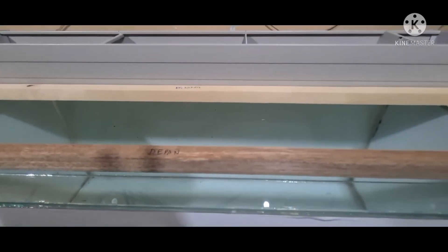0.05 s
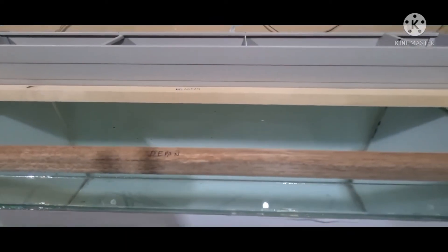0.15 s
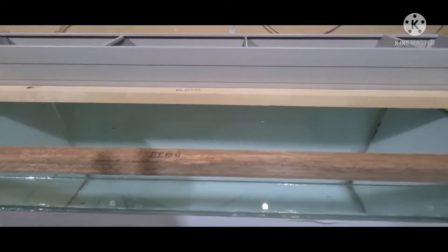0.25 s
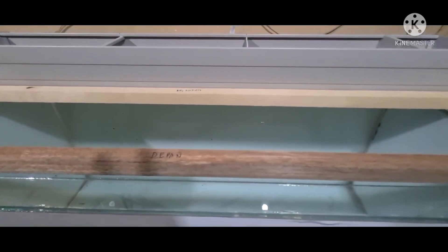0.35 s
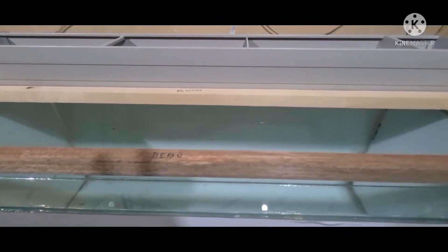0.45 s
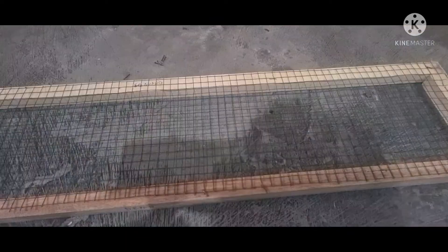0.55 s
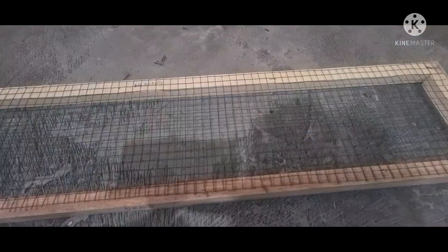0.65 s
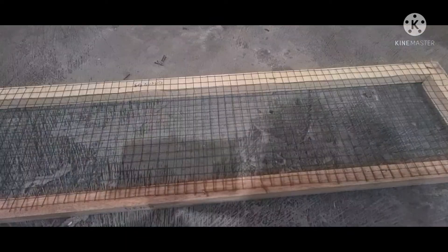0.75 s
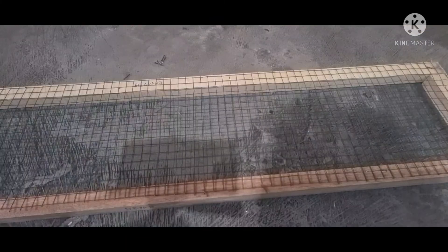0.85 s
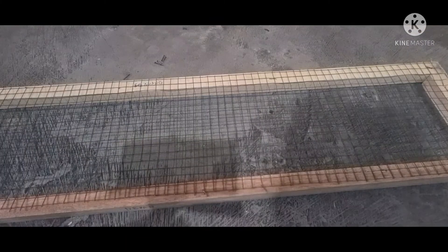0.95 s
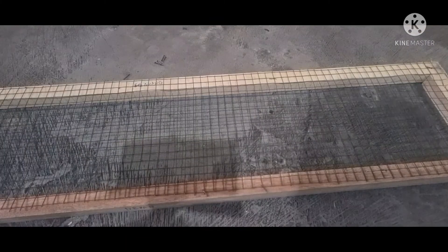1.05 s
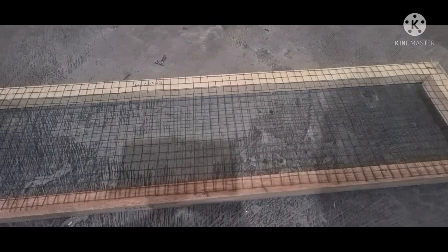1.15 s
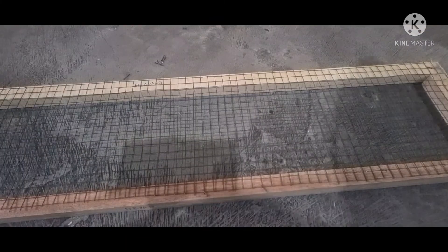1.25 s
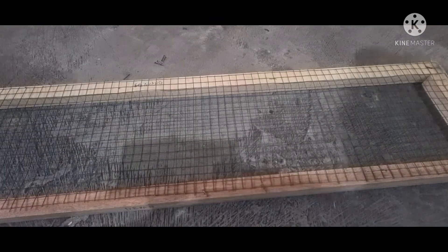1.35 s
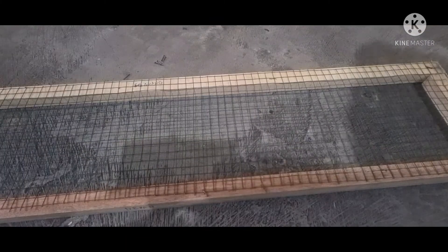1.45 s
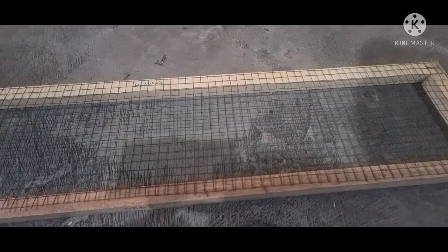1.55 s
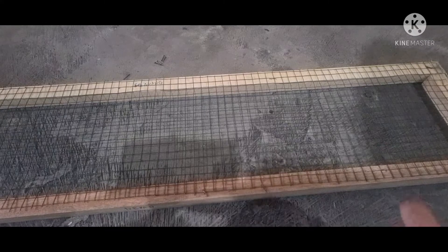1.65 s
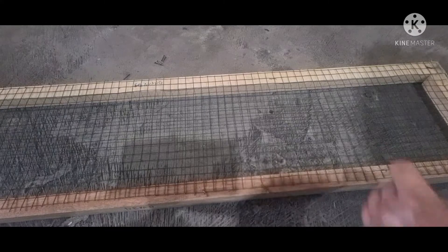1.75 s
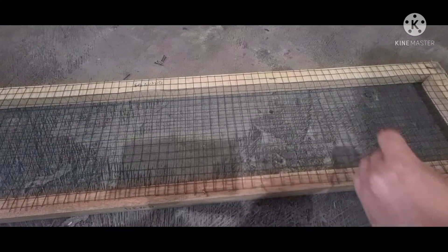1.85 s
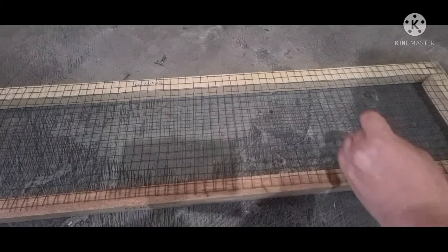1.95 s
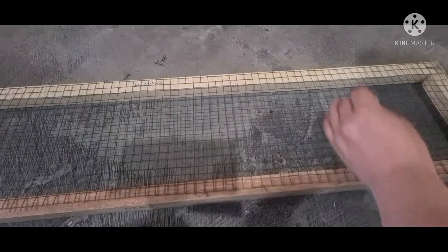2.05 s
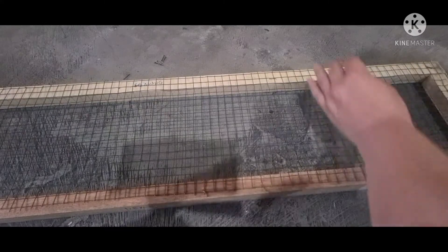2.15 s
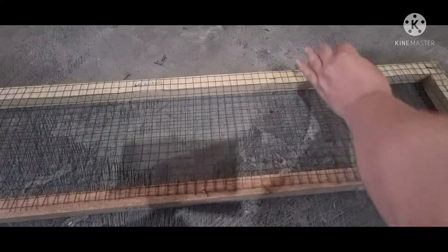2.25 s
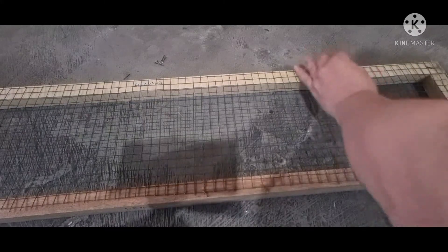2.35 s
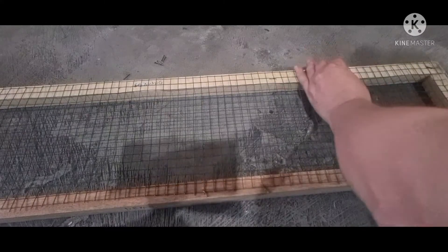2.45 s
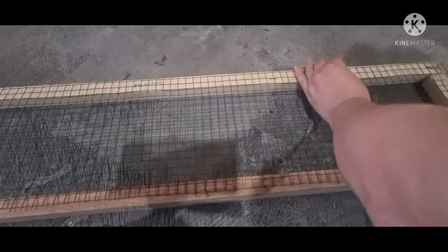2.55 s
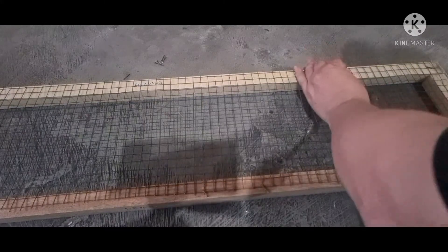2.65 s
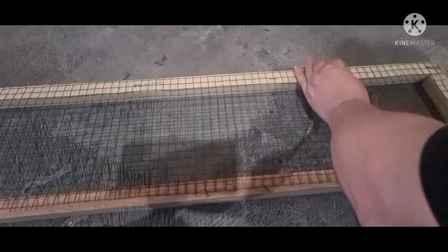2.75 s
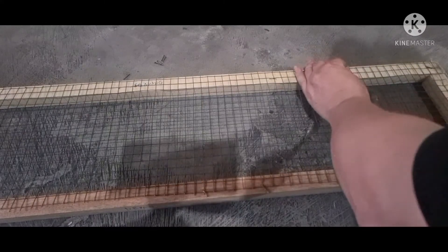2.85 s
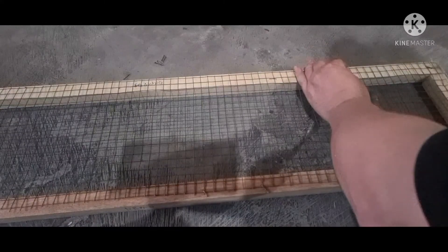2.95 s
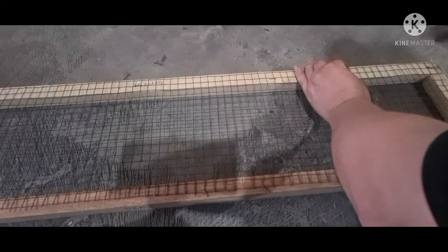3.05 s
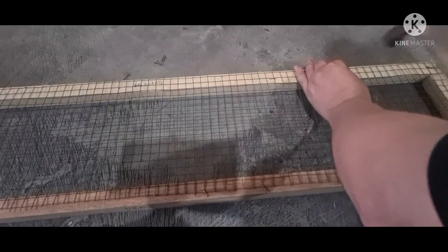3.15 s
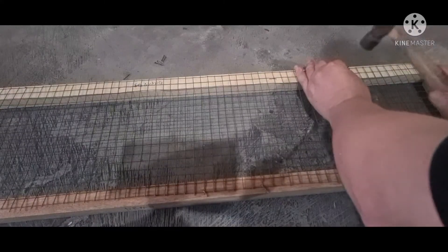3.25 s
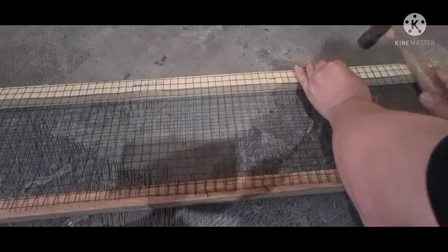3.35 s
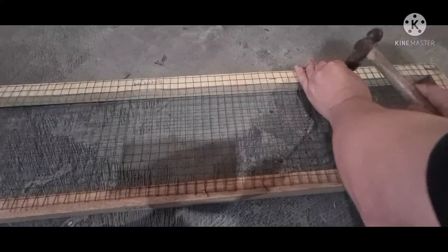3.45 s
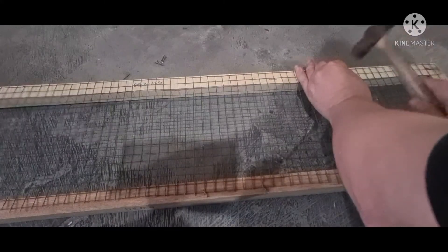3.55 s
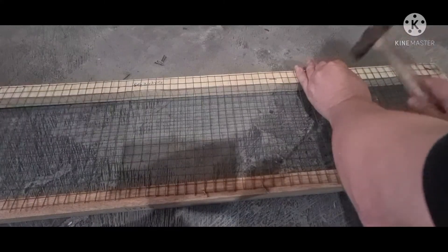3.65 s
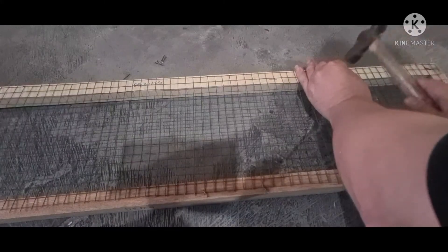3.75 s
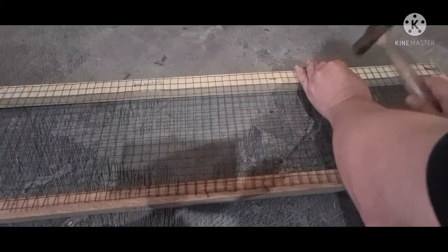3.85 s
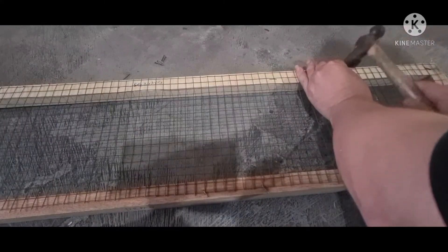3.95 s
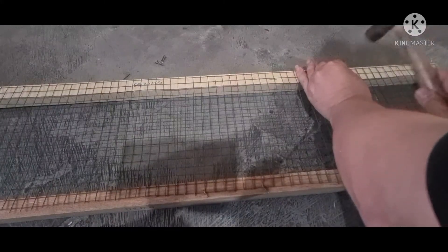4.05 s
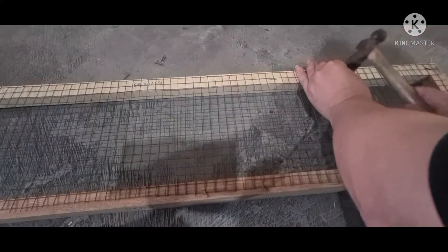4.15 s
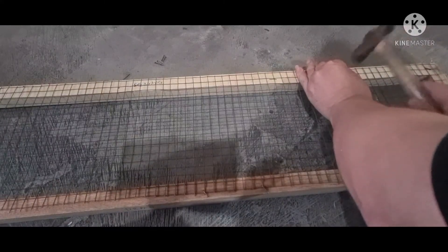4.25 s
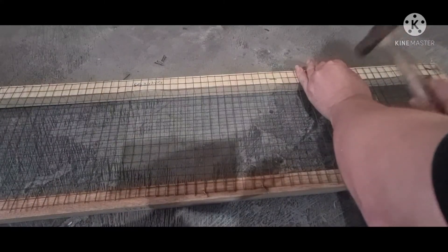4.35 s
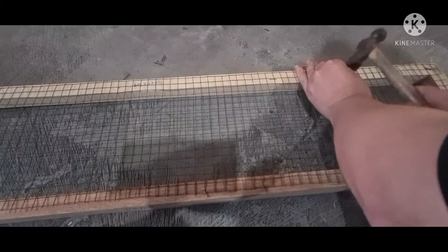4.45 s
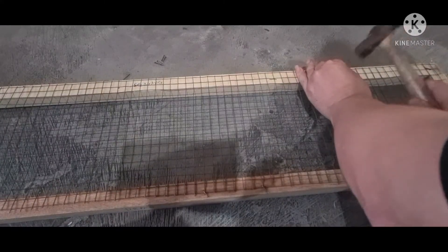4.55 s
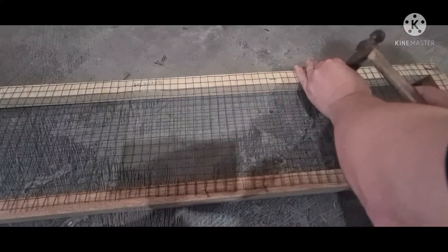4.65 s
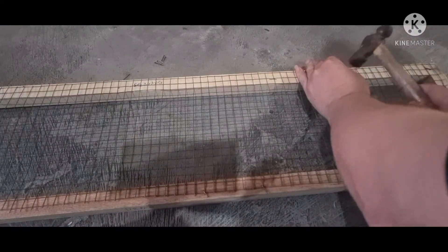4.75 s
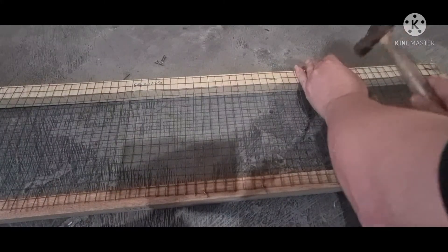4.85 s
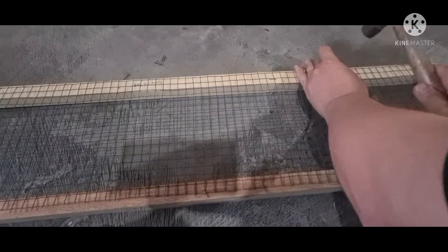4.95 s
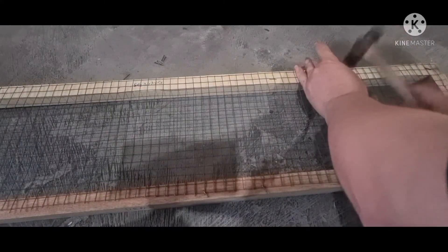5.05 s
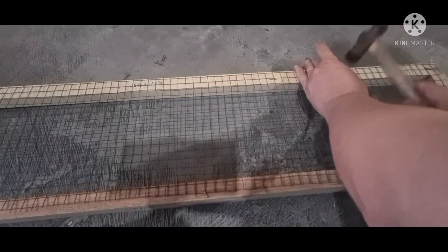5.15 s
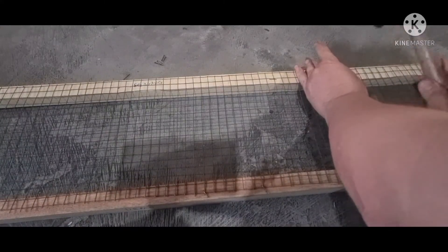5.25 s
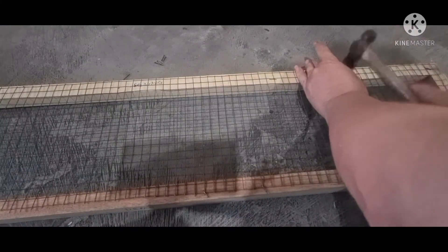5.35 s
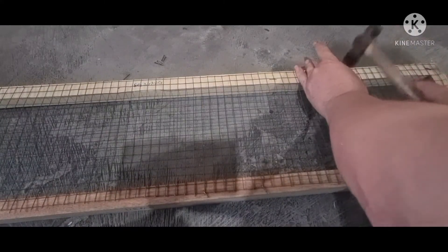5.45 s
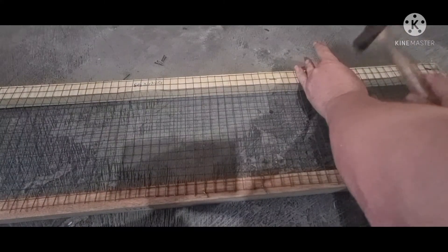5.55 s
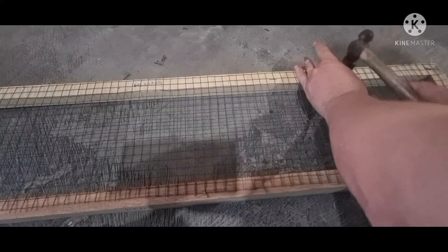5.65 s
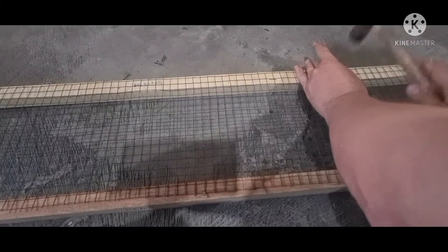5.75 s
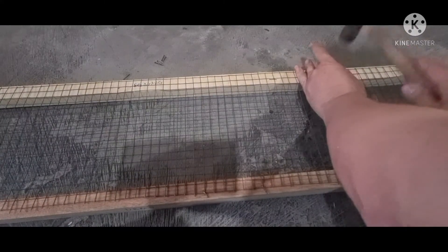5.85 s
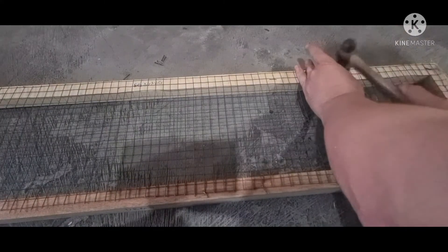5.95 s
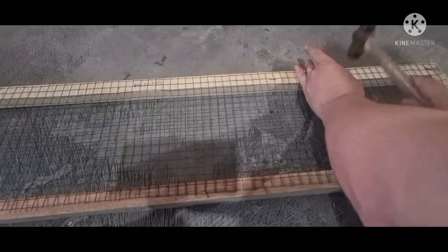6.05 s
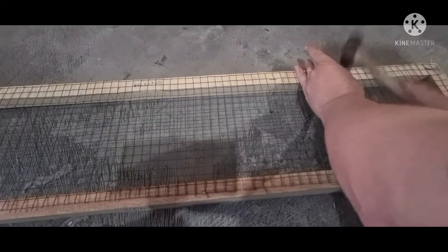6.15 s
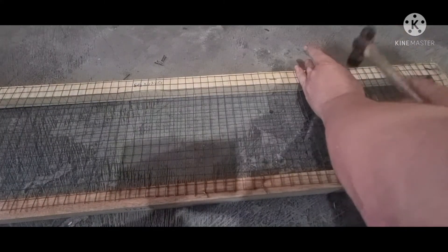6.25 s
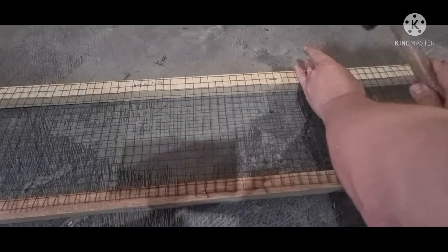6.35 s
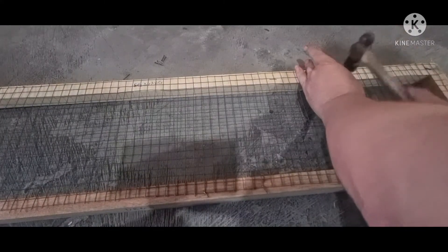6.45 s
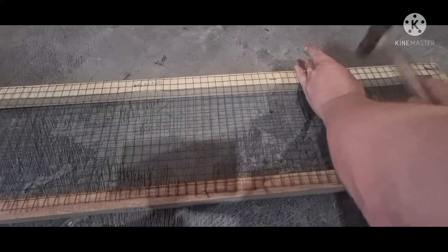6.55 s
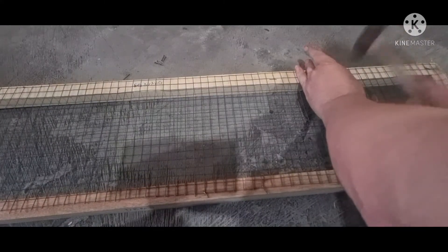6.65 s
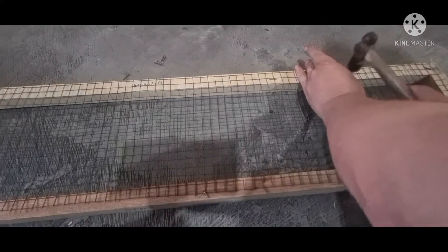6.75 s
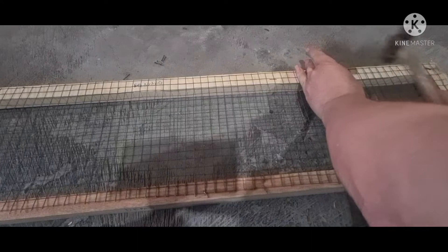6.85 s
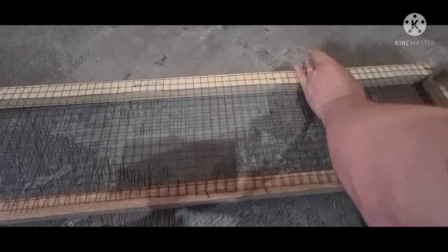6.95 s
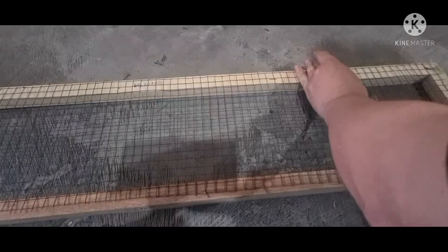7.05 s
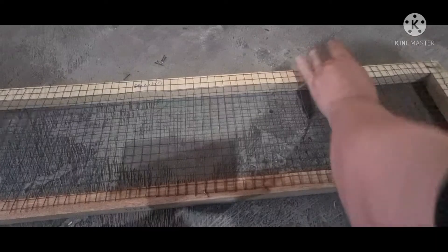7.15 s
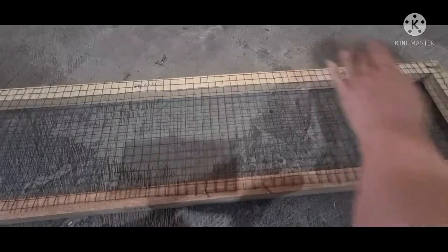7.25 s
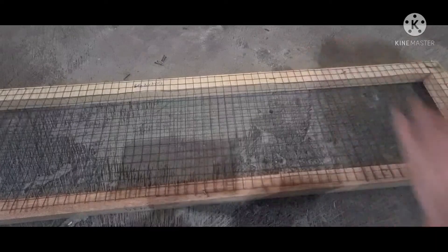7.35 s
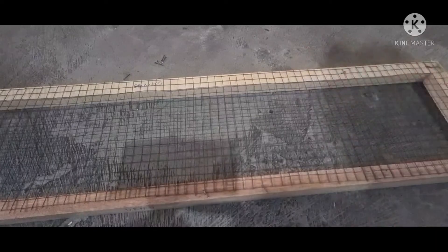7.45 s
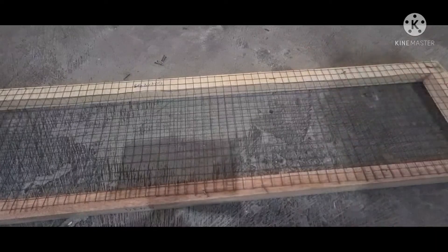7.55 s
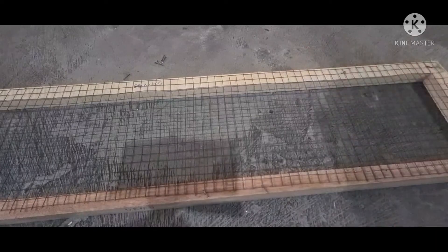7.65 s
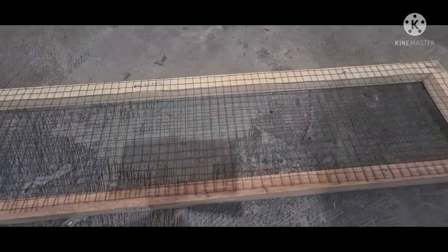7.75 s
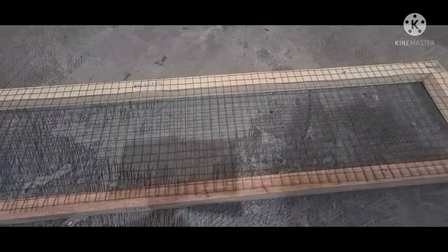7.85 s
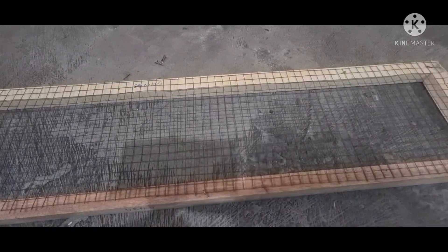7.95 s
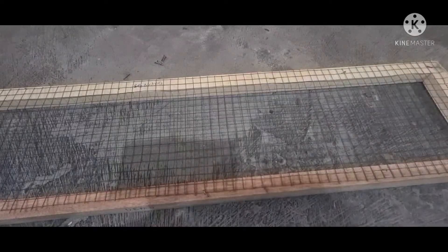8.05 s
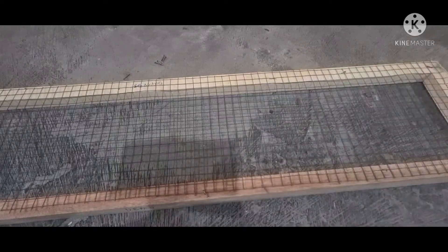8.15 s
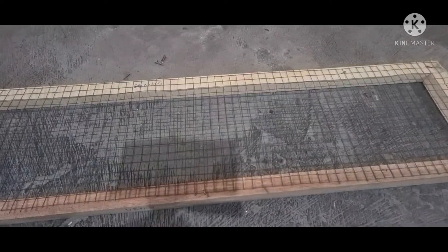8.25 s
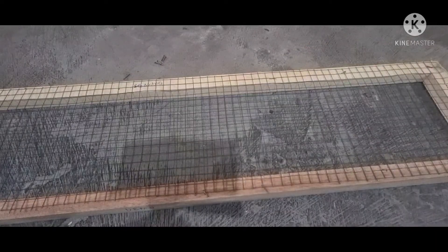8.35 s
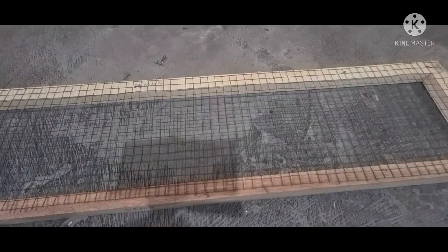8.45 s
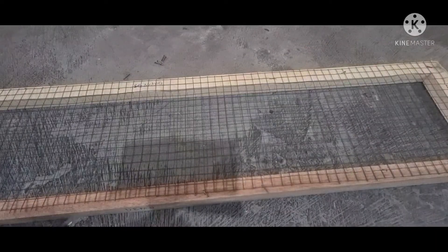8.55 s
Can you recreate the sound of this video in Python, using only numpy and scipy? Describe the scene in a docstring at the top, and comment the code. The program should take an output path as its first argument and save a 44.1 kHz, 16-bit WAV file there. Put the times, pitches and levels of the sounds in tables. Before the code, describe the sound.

Dull room tone cuts to a tiny silence, then a low motor hum fades in. A wooden frame drags and bumps over concrete with a thin wire squeal; shoes scuff and a hand rustles the mesh. Thirteen bright hammer blows follow, about four a second, with wood thud, steel ring and mesh rattle. The hammer is laid down with dead knocks, and a sole swishes past. Close stereo pickup in a live, bare workshop.

```python
"""A bare workshop with a concrete floor, heard by two microphones 0.17 m apart: room tone, then brief silence.
A motor's hum and rumble (sines, coloured noise) fade in; a mesh-covered wooden frame is dragged up, bumping
and squealing (shaped grains, pulses). Shoes scuff and pivot, a hand presses the mesh, wire rubs on a nail.
A hammer taps the nail in: wood and steel ring as decaying modes, mesh rattles, the frame hops, the room echoes.
Laid down, it knocks dead; a sole scuffs and swishes past, a heel lands, and shoes scuff faintly again."""
import sys
import numpy as np
from scipy import signal
from scipy.fft import rfft, irfft, next_fast_len
from scipy.io import wavfile

SR = 44100
rng = np.random.default_rng(int(sys.argv[2]) if len(sys.argv) > 2 else 0)


def inscribe(sig):
    """Save sig as 16-bit PCM at rate SR to the path in sys.argv[1].

    A 1-D sig is mono; a 2-D sig holds one channel per row.
    Samples are clipped to [-1, 1] before scaling.
    """
    pcm = np.round(np.clip(np.atleast_2d(sig).T, -1, 1) * 32767)
    wavfile.write(sys.argv[1], SR, pcm.astype(np.int16))


N = 379260
TIME = np.arange(N) / SR

# Levels in the tables are relative within each source; the mix and the room set the balance.
# room tone before the silence: [f/Hz, level/dB]
OPENING_COLOUR = [(15, -56), (25, -32), (43, -4), (106, -2), (134, -11), (243, -8), (463, -22),
                  (500, -22.5), (979, -30), (1060, -19), (1140, -38), (1270, -27), (12000, -65),
                  (15600, -106), (22000, -120)]
OPENING_DB = -43.5
# all sound drops out briefly: [from t/s, to t/s]
SILENCE_SPAN = (0.448, 0.57)

# low rumble and faint air noise around the microphones: [f/Hz, level/dB]
RUMBLE_COLOUR = [(15, -48.5), (25, -10), (59, 0.5), (78, 0), (108, -9), (128, -6.5), (157, -8), (189, 3),
                 (210, -7), (301, -18), (372, -14.5), (408, -32), (600, -35), (780, -29), (1320, -120)]
AIR_COLOUR = [(240, -23), (400, 1), (687, -2.5), (1630, -5.5), (1760, -7), (4440, -21.5), (4800, -22.5),
              (5350, -24), (14600, -38.5), (16000, -43)]
# the motor's hum tones: [f/Hz, level/dB]
HUM_TONES = [(47.5, -49.5), (140.5, -49), (188, -49.5), (378, -59.5)]
# the motor's faint whine: [f/Hz, width/Hz, level/dB]
WHINE_BAND = [(1734, 22, 0)]
RUMBLE_DB, AIR_DB, WHINE_DB = -39, -49.5, -63.5
# rumble, air and whine hold steady, then sink slowly; the whine sinks with the air
SINKS_FROM_S, RUMBLE_SINK_DB_PER_S, AIR_SINK_DB_PER_S = 3.5, 0.6, 1

# paths to each microphone, direct and off the floor: [delay/ms, level/dB]
LEFT_MIC_PATHS = [(0.078, -5), (0.978, -48)]
RIGHT_MIC_PATHS = [(0, 14.67), (1.506, 2.6)]
# echo strength of the workshop: [f/Hz, level/dB]
ROOM_ECHO_COLOUR = [(80, 8), (200, 0), (370, 6), (560, 4.5), (800, 2.5), (1300, 7), (2200, 1), (3300, 0),
                    (7000, 2), (15000, 6)]
# first echoes from nearby walls: [left delay/ms, right delay/ms, level/dB]
NEAR_WALL_ECHOES = [(9.56, 10.4, -10), (12.93, 12.1, -10.5), (20.26, 21.2, -11)]
# standing waves of the room: [mean f/Hz, mean level/dB, t60/s]
ROOM_MODES = [(179, 1.5, 0.15), (212.4, -6, .3), (366, 0.5, 0.3), (425.5, 1, 0.54), (475, 0, 0.44),
              (676, -3, 0.28), (796, -7, .3)]
BOOM_DB, MIC_SPACING_M = -21, 0.17
# base t60, shortened above the wall cut and in the bass
ROOM_T60_S, WALL_CUT_HZ, BASS_LOSS_HZ = 0.48, 14300, 36.3

# wood dragged over the rough floor: [f/Hz, level/dB]
DRAG_SPECTRUM = [(120, -20), (200, -2), (560, -0.5), (775, -4.5), (980, 2), (3060, -20), (3730, -19),
                 (4390, -26), (5760, -25), (6650, -21), (15000, -54)]
# resonances of the squealing wire end: [f/Hz, width/Hz, level/dB]
SQUEAL_BANDS = [(2490, 73, 7), (2653, 82, 7), (3050, 59, 12), (4410, 70, 11), (6600, 61, 6.5),
                (9000, 110, -3.5), (11400, 400, -11)]
# the wire end catches twice on the way: [t/s, hold/s, level/dB]
WIRE_CATCHES = [(0.663, 0.056, -54), (0.89, 0.11, -59.5)]
CATCH_ATTACK_S, CATCH_RELEASE_S = 0.13, 0.095
# the frame is dragged in one pull
PULL_AT_S, PULL_ATTACK_S, PULL_HOLD_S, PULL_RELEASE_S, PULL_DB = 0.76, 0.28, 0.24, 0.056, -31.5
# rms swings of pitch (share) and level, each with the upper limit of its pace
SQUEAL_WANDER, WANDER_HZ = 0.006, 60
STICK_DB, STICK_HZ = 5, 45
JUDDER_DB, JUDDER_HZ = 2.2, 40

# the frame is bumped: [t/s, level/dB, brightness f/Hz]
FRAME_BUMPS = [(.623, -8.5, 3300), (0.821, -11.5, 2020), (0.8974, -10.5, 2240), (1.003, -19, 2200),
               (1.212, -9, 1820), (1.982, -11, 1830), (2.026, -15.5, 490), (2.598, -23, 2000),
               (3.397, -20, 1100), (3.586, -4, 1680)]
# clicks of wire and grit: [t/s, level/dB, pitch f/Hz]
WIRE_TICKS = [(1.175, -44, 6100), (1.699, -14.5, 3070), (2.488, -31, 4250), (2.51, -46, 4830),
              (2.873, -35, 4050), (3.297, -49, 9000), (3.33, -53, 8900), (7.29, -30.5, 2630),
              (8.499, -33.5, 4760), (8.561, -28, 3500)]

# shoes sliding on concrete: [full speed at t/s, attack/s, hold/s, level/dB, weight on the sole/dB]
SHOE_SCUFFS = [(1.513, .1, 0.027, -39.5, -6), (1.591, 0.034, 0.088, -30.5, -3),
               (2.112, 0.14, 0.16, -55.5, -16), (2.292, 0.052, 0.017, -41, -8),
               (7.628, 0.064, 0.14, -42, -0.5), (8.128, 0.48, 0.028, -65, -24),
               (8.317, 0.071, 0.027, -65.5, 5), (8.54, 0.14, .07, -51.5, 1.5)]
# spectra of dull sole, rasping concrete face and rolling grit: [f/Hz, level/dB per Hz]
SOLE_COLOUR = [(400, -14), (900, -8), (1350, -5), (1750, -3), (2200, -9), (3000, -20)]
RASP_COLOUR = [(1700, -30), (2400, -2.5), (3000, 6), (4200, 0), (6000, -28)]
GRIT_COLOUR = [(3000, -6), (4700, 1), (7000, -1), (11000, -7), (15500, -9.5)]
SCUFF_RELEASE_S, SOLE_RELEASE_S = 0.0079, 0.0093
RASP_DB, RASP_FOLLOWS_WEIGHT = 0.1, 0.22  # dB, and dB per dB of weight

# a shoe pivots with a short rub close by: [f/Hz, level/dB per Hz]
PIVOT_COLOUR = [(500, -20), (1100, -14.5), (1450, -7.5), (1720, 1), (2050, -8), (2500, -11.5), (3500, -16),
                (6000, -29)]
PIVOT_AT_S, PIVOT_ATTACK_S, PIVOT_HOLD_S, PIVOT_RELEASE_S, PIVOT_DB = 2.272, 0.05, 0.06, 0.03, -39.5
# a hand presses the mesh onto the frame: [f/Hz, level/dB per Hz]
PALM_COLOUR = [(150, 0), (400, 6), (1200, 5.5), (2000, -8), (5000, -41), (12000, -40)]
PRESS_AT_S, PRESS_ATTACK_S, PRESS_HOLD_S, PRESS_RELEASE_S, PRESS_DB = 2.5, 0.03, 0.014, 0.062, -41.5
# mesh rubs on the nail: [f/Hz, width/Hz, level/dB]
SQUEAK_BANDS = [(2790, 89, 22), (3170, 98, 11), (4530, 160, -2)]
RUB_AT_S, RUB_ATTACK_S, RUB_HOLD_S, RUB_RELEASE_S, RUB_DB = 3.398, 0.008, 0.026, 0.018, -54.5

# hammer blows: [t/s, frame thud level/dB, batten level/dB, nail ring level/dB, lower ring level/dB,
#                steel tick level/dB, tick pitch f/Hz, top click level/dB, mesh shake level/dB]
HAMMER_BLOWS = [(3.5621, -5.5, -3.5, -12.5, -20, -7.5, 8350, -19, -13),
                (3.8125, 3.5, 2, -8.5, -6, -7.5, 8000, -18, -34),
                (4.02, 3.5, 3.5, -1.5, 3.5, -14, 8800, -11.5, -17),
                (4.279, 2.5, 1.5, -2, 1.5, 0, 7700, -10.5, -12),
                (4.5179, 2.5, 3, -0.5, 4.5, -15, 9000, -10.5, -12),
                (4.727, 4, 1, -1, -1, -23, 8100, -13, -10), (5.1927, 2, 1, -0.5, 6, -28, 7150, -25, -8.5),
                (5.485, 1, 0.5, 0, -1, 7.5, 7700, -25, -8), (5.729, 0.5, -1, 0, 2, 4.5, 7100, -19, -7),
                (6.052, -3, -0.5, -12.5, -5.5, -27, 9500, -14.5, -19),
                (6.293, -5, -2, -14.5, -12, -34, 9000, -14, -28), (6.57, 6, 4, -4.5, -9, -6, 8500, -14, -2),
                (6.808, 6, 6, -5.5, -12, -18, 9000, -18, -1)]
# modes of frame on floor, batten, nail and the lower, longer ring: [mean f/Hz, mean level/dB, t60/s]
THUD_MODES = [(73.4, -9.5, 0.038), (143, -13, 0.29), (187.8, 0.5, 0.11), (206, 12, 0.046)]
WOOD_MODES = [(388, -8, 0.026), (443, -6.5, 0.02), (672, 2, 0.019), (882, -5.5, 0.013), (1006, -2, 0.018),
              (1310, -1.5, 0.013), (1660, -3, 0.017), (1824, -3.5, 0.014), (2614, -0.5, 0.018),
              (2854, -8.5, 0.014)]
NAIL_MODES = [(3070, -6.5, 0.0081), (3400, 1.5, 0.015), (3620, -4, 0.0076), (3954, -6, 0.0094),
              (4730, -14, 0.012), (5480, -14, 0.013), (6710, -19.5, 0.0083)]
SING_MODES = [(2870, -7, 0.059), (2960, -2, 0.026)]
THUD_DB = 0.5
NAIL_SLIP_S = 0.0006  # the nail gives way and rings just after the contact
MESH_T60_S, MESH_TAPS_PER_S = 0.05, 1800  # mesh against wood
RATTLE_DB, RATTLE_T60_S, RATTLE_PER_S = -12.5, 0.12, 2100  # wires tap on each other
# the frame hops after a blow and lands again: [t/s, level/dB]
FRAME_HOPS = [(3.5743, 2), (3.613, -10), (4.0546, 2), (4.3095, 1.5), (4.563, -3.5), (4.766, -2),
              (5.7577, 2.5), (6.857, 5.5)]
# the mesh springs back against the wood after the first blow: [t/s, level/dB]
MESH_SPRINGS = [(3.602, -16), (3.64, -15.5), (3.672, -24)]
# modes of the loose wire: [mean f/Hz, mean level/dB, t60/s]
WIRE_MODES = [(4160, 10, 0.029), (4570, -5, 0.025), (5600, -9, 0.019)]

# hammer head and handle land and rebound: [t/s, level/dB, brightness f/Hz]
HAMMER_LANDINGS = [(7.3503, -1, 2030), (7.3551, -6, 1600), (7.3705, -1, 3000), (7.3765, -6.5, 1900),
                   (7.44, -14, 1510), (7.477, -21, 2020)]
# a sole sweeps past with a falling swish: [t/s, hold/s, level/dB, pitch f/Hz at that time]
SOLE_SWISHES = [(7.617, 0.023, -47.5, 1570), (7.736, 0.053, -49.5, 1390)]
SWISH_FALL_PER_S, SWISH_WIDTH_HZ = 2.2, 180  # share of the pitch lost in a second, down to half
HEEL_AT_S, HEEL_DB = 7.765, -7  # then the heel comes down

CUTOFF_HZ = 16500  # the top is 60 dB down from here


def from_db(db):
    """Decibels to amplitude ratio."""
    return 10 ** (np.asarray(db) / 20)


def rms_one(x):
    """Scale to rms 1."""
    return x / np.sqrt(np.mean(x ** 2) + 1e-20)


def energy_one(x):
    """Scale to a summed square of 1."""
    return rms_one(x) / np.sqrt(x.shape[-1])


def at_hz(points, hz):
    """Read a spectrum on a log-frequency axis."""
    known, values = np.transpose(points)
    return np.interp(np.log(np.maximum(hz, 1)), np.log(known), values)


def low_pass(x, hz, order=2):
    """Take off the treble above a frequency."""
    return signal.sosfilt(signal.butter(order, min(hz, .45 * SR), fs=SR, output="sos"), x)


def band_pass(x, low_hz, high_hz):
    """Keep one band of a sound."""
    return signal.sosfilt(signal.butter(2, [low_hz, high_hz], "band", fs=SR, output="sos"), x)


def coloured(x, spectrum):
    """Give a sound a spectrum; rms 1."""
    size = next_fast_len(x.shape[-1])
    gain = from_db(at_hz(spectrum, np.fft.rfftfreq(size, 1 / SR)))
    shaped = irfft(rfft(x, size) * gain, size)
    return rms_one(shaped[..., :x.shape[-1]])


def diffuse(size):
    """Noise from all sides: two spaced microphones agree only in the bass."""
    padded = next_fast_len(size)
    mid, side = rfft(rng.standard_normal((2, padded)))
    alike = np.sinc(2 * np.fft.rfftfreq(padded, 1 / SR) * MIC_SPACING_M / 343)  # speed of sound 343 m/s
    pair = np.sqrt(1 + alike) * mid + np.sqrt(1 - alike) * side * [[1], [-1]]
    return rms_one(irfft(pair, padded)[:, :size])


def drift(hz):
    """Slow chance, low-passed noise; rms 1."""
    return rms_one(low_pass(rng.standard_normal(N), hz))


def grains(per_s, spread_db):
    """Random tiny contacts of uneven size; rms 1."""
    sizes = from_db(spread_db * np.minimum(rng.exponential(1, N), 4))
    return rms_one((rng.random(N) < per_s / SR) * sizes * rng.choice([-1, 1], N))


def resonate(x, resonances):
    """Drive parallel resonances; rms 1."""
    total = 0
    for hz, width_hz, db in resonances:
        peak = signal.lfilter(*signal.iirpeak(hz, hz / width_hz, fs=SR), x)
        total = total + from_db(db) * rms_one(peak)
    return rms_one(total)


def stroke(s, attack_s, hold_s, release_s, db):
    """Gain of a sliding move: it swells up to its time, holds and dies; attack and release each span 20 dB."""
    away = np.maximum((s - TIME) / attack_s, (TIME - s - hold_s) / release_s)
    return from_db(db - 20 * np.clip(away, 0, 10))


def snap(low_hz, high_hz):
    """A single contact pulse; energy 1."""
    pulse = signal.unit_impulse(SR // 4) + 1e-18
    return energy_one(band_pass(pulse, low_hz, min(high_hz, .45 * SR)))


def burst(low_hz, high_hz, t60):
    """Many close, quickly damped modes blur into a crack; energy 1."""
    t = TIME[:SR // 4]
    dying = rng.standard_normal(len(t)) * from_db(-60 * t / t60) + 1e-18
    return energy_one(band_pass(dying, low_hz, min(high_hz, .45 * SR)))


def struck(modes, vary_db, detune):
    """One blow on a set of modes, each with a strength and pitch of its own; energy 1."""
    hz, db, t60 = np.transpose(modes)[:, :, None]
    t = TIME[:SR // 4]
    pitch_chance, level_chance = rng.standard_normal((2, len(modes), 1))
    signs = (-1) ** np.arange(len(modes))[:, None]
    waves = signs * np.sin(2 * np.pi * hz * (1 + detune * pitch_chance) * t)
    return energy_one(np.sum(from_db(db + vary_db * level_chance - 60 * t / t60) * waves, axis=0))


def rattle(low_hz, high_hz, per_s, t60):
    """A dying shower of wire taps; energy 1."""
    t = TIME[:SR // 4]
    taps = (rng.random(len(t)) < per_s / SR) * rng.standard_normal(len(t)) * from_db(-60 * t / t60)
    return energy_one(signal.fftconvolve(taps, snap(low_hz, high_hz))[:len(t)])


def add(track, s, sound):
    """Mix a sound in at a time."""
    start = round(s * SR)
    track[..., start:start + sound.shape[-1]] += sound[..., :N - start]


def opening_tone():
    """Diffuse room tone that breaks off at the silence."""
    gate = np.clip((SILENCE_SPAN[0] - TIME) / 0.0016, 0, 1)
    return from_db(OPENING_DB) * coloured(diffuse(N), OPENING_COLOUR) * gate


def background():
    """A motor's wavering hum and whine over low rumble and faint air noise."""
    sinking_s = np.maximum(TIME - SINKS_FROM_S, 0)
    rumble = from_db(RUMBLE_DB - RUMBLE_SINK_DB_PER_S * sinking_s) * coloured(diffuse(N), RUMBLE_COLOUR)
    air = from_db(AIR_DB - AIR_SINK_DB_PER_S * sinking_s) * coloured(diffuse(N), AIR_COLOUR)
    hum = 0
    for hz, db in HUM_TONES:
        phase = 2 * np.pi * hz * TIME + 1.02 * drift(2.27)
        hum = hum + from_db(db) * np.sqrt(2) * np.sin(phase)
    whine = resonate(rng.standard_normal(N), WHINE_BAND)
    whine = from_db(WHINE_DB - AIR_SINK_DB_PER_S * sinking_s) * whine
    return rumble + air + whine + from_db(-3.5) * hum


def workshop(x, echo_db, build_s, lag_ms, pan_db):
    """Direct sound and floor bounce, then dense wall echoes that build up and die by band."""
    t = TIME[:SR * 3 // 4]
    edges = 45 * 2 ** np.arange(0, 9, .5)  # half-octave bands
    noises, tail = [diffuse(len(t)), diffuse(len(t))], 0
    for k, (low, high) in enumerate(zip(edges, edges[1:])):
        hz = np.sqrt(low * high)
        t60 = ROOM_T60_S / (1 + (hz / WALL_CUT_HZ) ** 2 + BASS_LOSS_HZ / hz)
        band = band_pass(noises[k % 2], low, high)
        band = energy_one(band * from_db(-60 * t / t60) * (1 - np.exp(-t / build_s)))
        tail = tail + band * np.sqrt(2 * (high - low) / SR) * from_db(at_hz(ROOM_ECHO_COLOUR, hz))
    left = sum(from_db(db) * np.interp(TIME - (ms + lag_ms) / 1000, TIME, x) for ms, db in LEFT_MIC_PATHS)
    right = sum(from_db(db) * np.interp(TIME - ms / 1000, TIME, x) for ms, db in RIGHT_MIC_PATHS)
    near = np.array([left, right]) * from_db([[pan_db / 2], [-pan_db / 2]])
    return near + from_db(echo_db) * signal.fftconvolve(x[None], tail, axes=1)[:, :N]


def drag():
    """Wood judders over the rough floor in dense slips; a wire end squeals along, sticking and slipping."""
    pull = stroke(PULL_AT_S, PULL_ATTACK_S, PULL_HOLD_S, PULL_RELEASE_S, PULL_DB)
    slips = grains(per_s=2300, spread_db=7.0)
    wandering = TIME + SQUEAL_WANDER * np.cumsum(drift(WANDER_HZ)) / SR
    wire = np.interp(wandering, TIME, resonate(grains(per_s=3000, spread_db=5.0), SQUEAL_BANDS))
    caught = sum(stroke(s, CATCH_ATTACK_S, hold_s, CATCH_RELEASE_S, db) for s, hold_s, db in WIRE_CATCHES)
    squeal = caught * wire * from_db(STICK_DB * drift(STICK_HZ))
    judder = from_db(JUDDER_DB * drift(JUDDER_HZ))
    wood = judder * pull * coloured(slips, DRAG_SPECTRUM)
    return from_db(-10.0) * wood + from_db(6.5) * squeal


def knocks(rows, low_hz, t60):
    """Short dead knocks: one pulse and a brief blur of many modes; each contact has its own brightness."""
    out = np.zeros(N)
    for s, db, bright_hz in rows:
        contact = snap(low_hz, bright_hz) + .5 * burst(low_hz, bright_hz, t60)
        add(out, s, from_db(db) * energy_one(low_pass(contact, 1.2 * bright_hz, order=4)))
    return out


def ticks():
    """A wire or a grain of grit snaps: a sharp edge and a brief ring."""
    out = np.zeros(N)
    for s, db, hz in WIRE_TICKS:
        ring = burst(hz * .5, hz * 1.09, t60=0.033)
        edge = snap(hz * 0.11, 6400)
        add(out, s, from_db(db) * (2.08 * ring + edge))
    return out


def scuffs():
    """A sole rubs dully on the concrete, rasps on its rough face and rolls fine grit under it."""
    sole = rasp = grit = 0
    for s, attack_s, hold_s, db, weight_db in SHOE_SCUFFS:
        slide = stroke(s, attack_s, hold_s, SCUFF_RELEASE_S, db)
        sole = sole + stroke(s, attack_s, hold_s, SOLE_RELEASE_S, db + weight_db)
        rasp = rasp + slide * from_db(RASP_DB + RASP_FOLLOWS_WEIGHT * weight_db)
        grit = grit + slide
    rub = sole * coloured(grains(per_s=2400, spread_db=4.5), SOLE_COLOUR)
    scrape = rasp * coloured(grains(per_s=5100, spread_db=2.5), RASP_COLOUR)
    hiss = grit * coloured(grains(per_s=14000, spread_db=-2.0), GRIT_COLOUR)
    return from_db(-7.5) * (rub + scrape + hiss)


def pivot():
    """A sole twists on the spot in fine slips."""
    twist = stroke(PIVOT_AT_S, PIVOT_ATTACK_S, PIVOT_HOLD_S, PIVOT_RELEASE_S, PIVOT_DB)
    return twist * coloured(grains(per_s=3000, spread_db=2.5), PIVOT_COLOUR)


def palm():
    """The mesh rustles dully under a hand, in many small wire contacts."""
    press = stroke(PRESS_AT_S, PRESS_ATTACK_S, PRESS_HOLD_S, PRESS_RELEASE_S, PRESS_DB)
    return press * coloured(grains(per_s=1100, spread_db=7.5), PALM_COLOUR)


def squeak():
    """Wire sticks and slips briefly against the nail as it is set."""
    rub = stroke(RUB_AT_S, RUB_ATTACK_S, RUB_HOLD_S, RUB_RELEASE_S, RUB_DB)
    return rub * resonate(grains(per_s=1900, spread_db=6.0), SQUEAK_BANDS)


def frame():
    """Each blow cracks in the batten and thuds the frame on the floor."""
    out = np.zeros(N)
    for s, thud_db, batten_db, *_ in HAMMER_BLOWS:
        thud = struck(THUD_MODES, vary_db=.7, detune=.025)
        batten = struck(WOOD_MODES, vary_db=1.0, detune=.009)
        wood = 0.97 * batten + 0.21 * burst(580, 1750, t60=0.016)
        add(out, s, from_db(THUD_DB + thud_db) * thud + from_db(batten_db) * wood)
    return out


def nail():
    """Steel ticks on the nail head, then the nail gives way with a short, gritty clack."""
    out = np.zeros(N)
    for s, _, _, ring_db, _, tick_db, tick_hz, click_db, _ in HAMMER_BLOWS:
        shank = struck(NAIL_MODES, vary_db=1.0, detune=.007)
        clack = 0.49 * burst(2500, 4200, t60=0.014)
        clack += 0.18 * burst(5600, 6400, t60=0.012) + 0.087 * burst(8900, 9100, t60=0.024)
        tick = 0.17 * snap(tick_hz * 0.36, tick_hz)
        tick += 0.68 * burst(tick_hz * 0.42, tick_hz * 0.73, t60=0.013)
        click = 0.5 * snap(8700, 21000) + 0.85 * burst(7300, 23700, t60=0.013)
        add(out, s, from_db(tick_db) * tick + from_db(click_db) * click)
        add(out, s + NAIL_SLIP_S, from_db(ring_db) * (2.48 * shank + clack))
    return out


def singing():
    """A lower, longer ring follows each blow and carries mostly through the room."""
    out = np.zeros(N)
    for s, _, _, _, sing_db, *_ in HAMMER_BLOWS:
        add(out, s, from_db(sing_db) * 0.33 * struck(SING_MODES, vary_db=4.0, detune=0.0033))
    return out


def mesh():
    """The shaken mesh chatters against the wood and its wires rattle a little longer."""
    out = np.zeros(N)
    for s, *_, shake_db in HAMMER_BLOWS:
        chatter = 0.93 * rattle(920, 2020, MESH_TAPS_PER_S, MESH_T60_S)
        chatter += 1.02 * rattle(2060, 4100, MESH_TAPS_PER_S, MESH_T60_S)
        wires = from_db(RATTLE_DB) * rattle(2700, 11500, RATTLE_PER_S, RATTLE_T60_S)
        add(out, s, from_db(shake_db) * (chatter + wires))
    return out


def boom(x):
    """Heavy knocks set the room's standing waves ringing, differently at each microphone."""
    shared = struck(ROOM_MODES, vary_db=0, detune=0)
    own = [struck(ROOM_MODES[2:], vary_db=2, detune=.005) for _ in range(2)]
    ringing = shared + 0.28 * np.array(own)
    return from_db(BOOM_DB) * signal.fftconvolve(x[None], ringing, axes=1)[:, :N]


def near_walls(x):
    """Nearby walls throw a blow back to each microphone as discrete delayed copies."""
    out = 0
    for left_ms, right_ms, db in NEAR_WALL_ECHOES:
        echoes = [np.interp(TIME - ms / 1000, TIME, x) for ms in (left_ms, right_ms)]
        out = out + from_db(db) * np.array(echoes)
    return out


def hops():
    """The frame falls back on the concrete with a duller clap."""
    out = np.zeros(N)
    for s, db in FRAME_HOPS:
        thud = struck(THUD_MODES, vary_db=1, detune=.03)
        clap = 0.28 * snap(280, 1070) + 0.35 * burst(130, 1340, t60=0.044)
        add(out, s, from_db(db) * (0.5 * thud + clap))
    return out


def springs():
    """Loose wire pings on the batten and buzzes out in a short shower."""
    out = np.zeros(N)
    for s, db in MESH_SPRINGS:
        ping = struck(WIRE_MODES, vary_db=1.5, detune=.012)
        buzz = 0.8 * rattle(3100, 5300, 2500, t60=0.037) + 0.36 * rattle(2000, 8300, 2500, t60=0.02)
        add(out, s, from_db(db) * (.65 * ping + buzz))
    return out


def step_back():
    """A sole sweeps over the floor, its pitch falling as it slows, and the heel lands."""
    out = np.zeros(N)
    for s, hold_s, db, hz in SOLE_SWISHES:
        speed = np.clip(1 - SWISH_FALL_PER_S * (TIME - s), .5, 2)
        rub = resonate(grains(per_s=4000, spread_db=0.5), [(hz, SWISH_WIDTH_HZ, 0)])
        travelled = np.cumsum(speed) / SR % TIME[-1]  # read the rub at the sole's speed
        out += stroke(s, 0.041, hold_s, .05, db) * np.interp(travelled, TIME, rub)
    heel = burst(63, 190, t60=0.11) + 0.34 * snap(200, 1300)
    add(out, HEEL_AT_S, from_db(HEEL_DB) * heel)
    return out


def scene():
    """Room tone and a moment of silence, then the work, each source placed before the microphones."""
    rubbing = ticks() + drag() + palm() + squeak() + scuffs()
    handling = workshop(rubbing, echo_db=4.5, build_s=0.00011, lag_ms=0.334, pan_db=15.5)
    bump = knocks(FRAME_BUMPS, low_hz=200, t60=0.047)
    bumps = workshop(bump, echo_db=1.0, build_s=0.00099, lag_ms=0.31, pan_db=13.0)
    shoe = workshop(pivot() + step_back(), echo_db=-9.0, build_s=0.003, lag_ms=0.014, pan_db=18.5)
    timber, shank = frame() + hops(), nail()
    slap = near_walls(timber + shank)
    wood = workshop(timber, echo_db=-3.0, build_s=0.00093, lag_ms=0.069, pan_db=20.5) + boom(timber)
    steel = workshop(shank, echo_db=-0.3, build_s=0.0011, lag_ms=0.037, pan_db=23)
    sung = workshop(singing(), echo_db=7, build_s=0.0028, lag_ms=0.016, pan_db=28)
    wire = workshop(mesh() + springs(), echo_db=7.5, build_s=0.0015, lag_ms=0.13, pan_db=16.5)
    landing = knocks(HAMMER_LANDINGS, low_hz=188, t60=0.016)
    laid_down = workshop(landing, echo_db=1.0, build_s=0.0011, lag_ms=0.26, pan_db=14)
    fade_in = np.clip((TIME - SILENCE_SPAN[1]) / 0.11, 0, 1)
    work = handling + bumps + shoe + wood + steel + slap + sung + wire + laid_down
    return opening_tone() + fade_in * (work + background())


def record(dry):
    """The microphones lose the deepest bass, the sharpest peaks are rounded, the top is cut."""
    thinned = signal.sosfilt(signal.butter(3, 32, "high", fs=SR, output="sos"), dry)
    rounded = 1.1 * np.tanh(thinned / 1.1)
    return signal.sosfilt(signal.cheby2(14, 60, CUTOFF_HZ, fs=SR, output="sos"), rounded)


dry = scene()
out = record(dry)
inscribe(out)
```